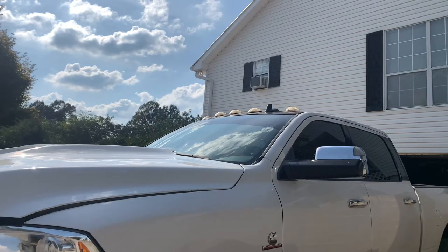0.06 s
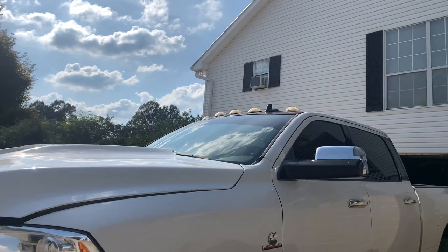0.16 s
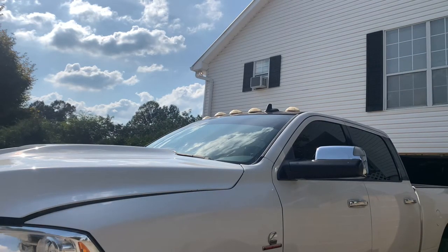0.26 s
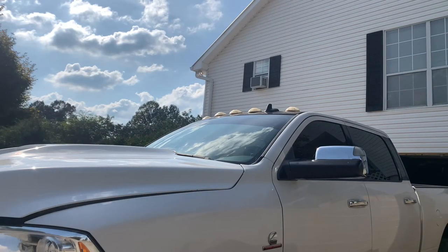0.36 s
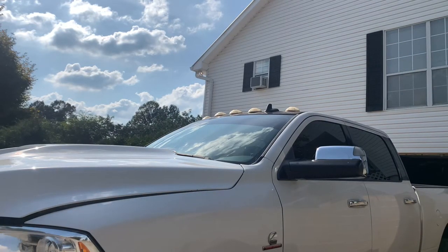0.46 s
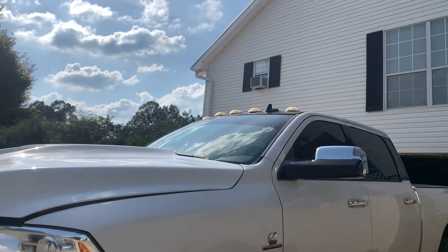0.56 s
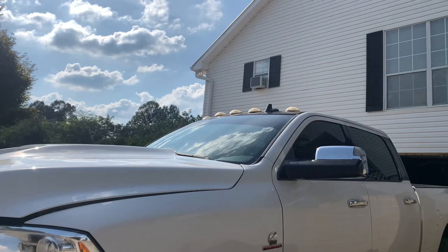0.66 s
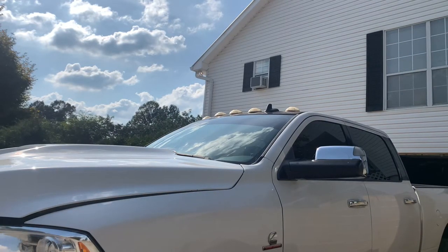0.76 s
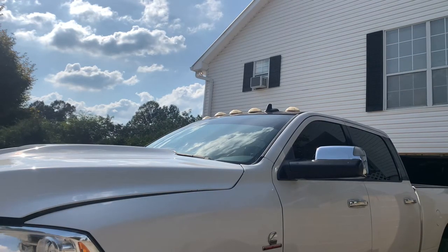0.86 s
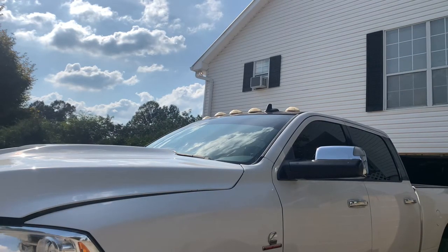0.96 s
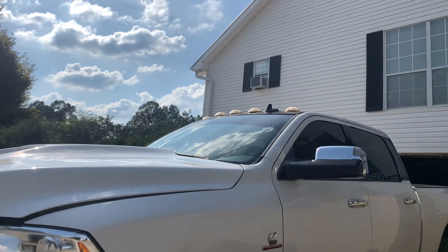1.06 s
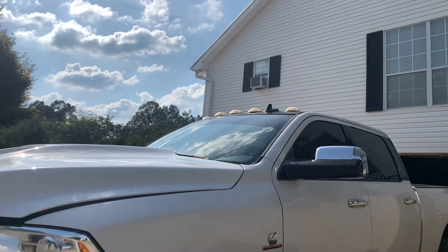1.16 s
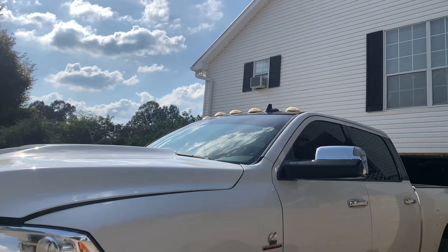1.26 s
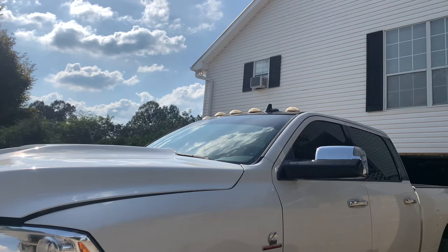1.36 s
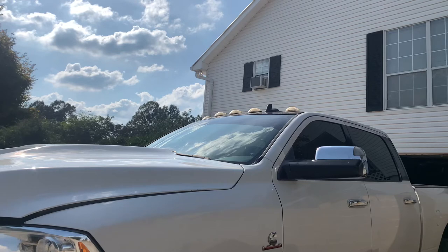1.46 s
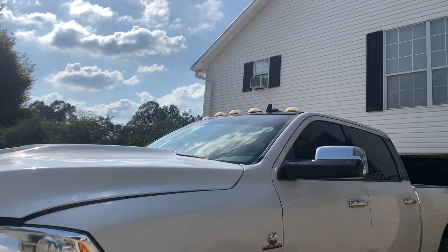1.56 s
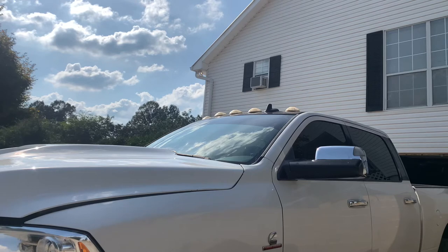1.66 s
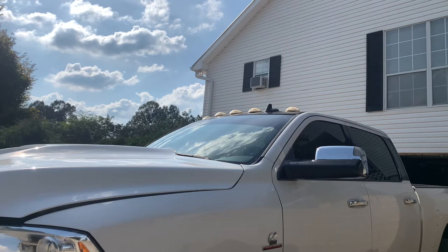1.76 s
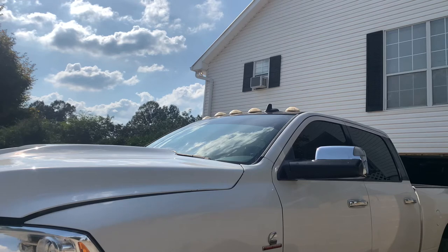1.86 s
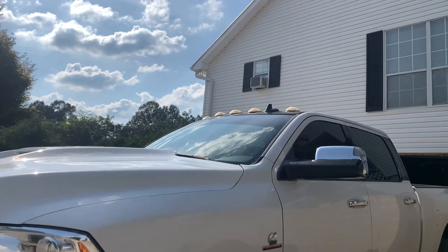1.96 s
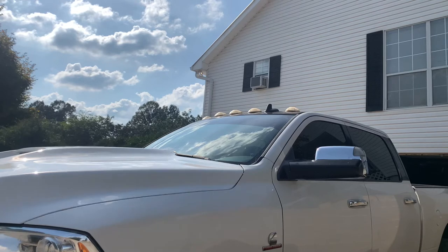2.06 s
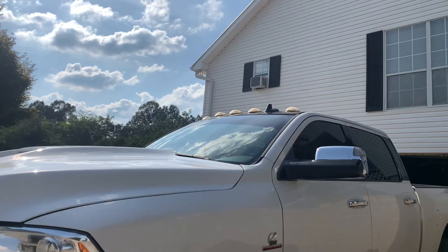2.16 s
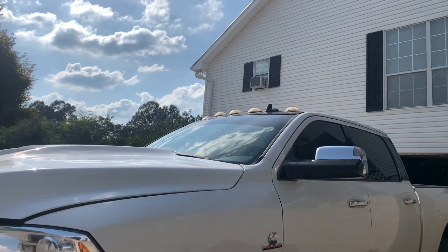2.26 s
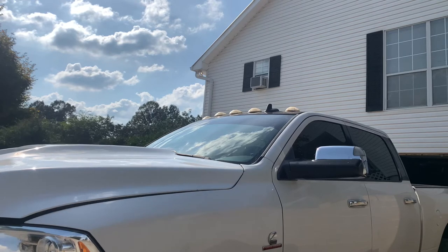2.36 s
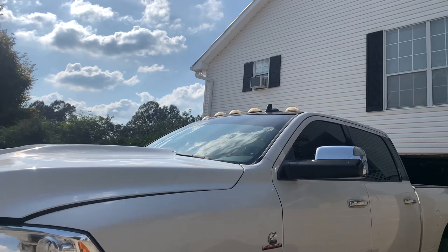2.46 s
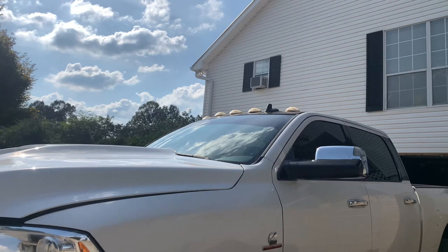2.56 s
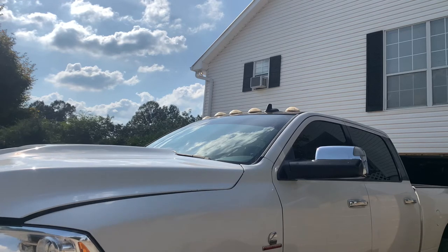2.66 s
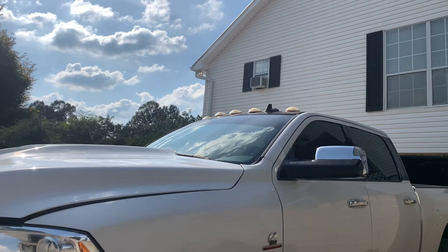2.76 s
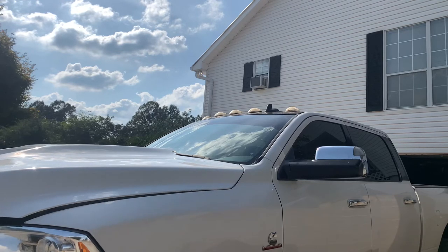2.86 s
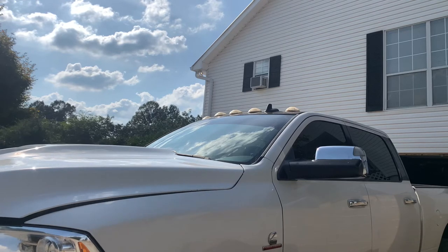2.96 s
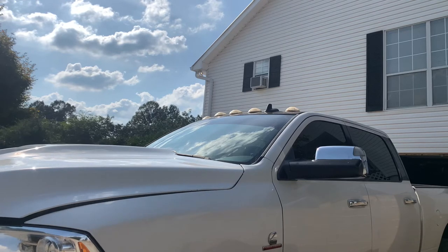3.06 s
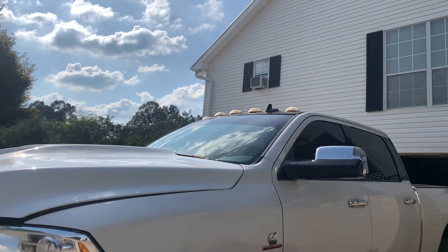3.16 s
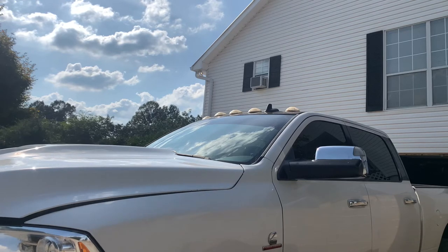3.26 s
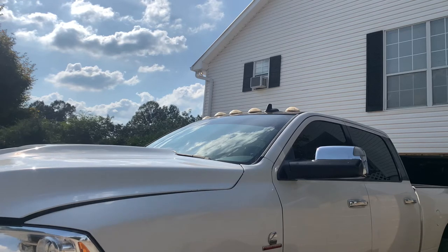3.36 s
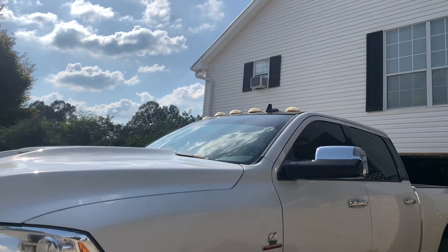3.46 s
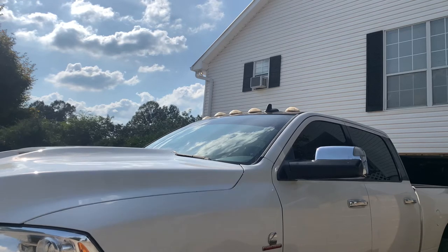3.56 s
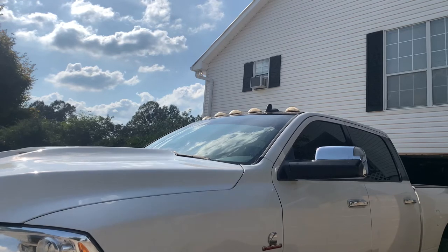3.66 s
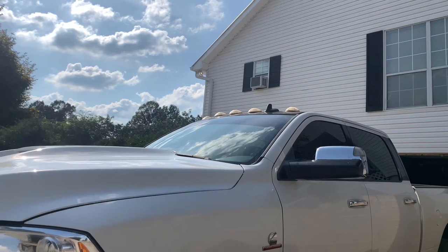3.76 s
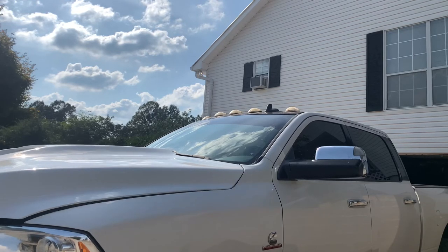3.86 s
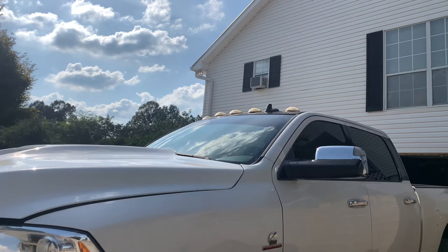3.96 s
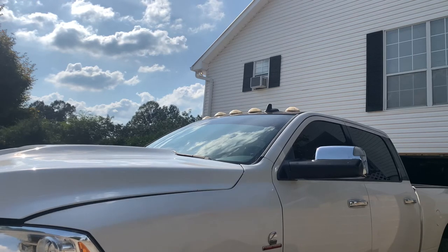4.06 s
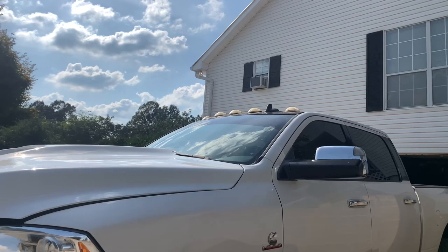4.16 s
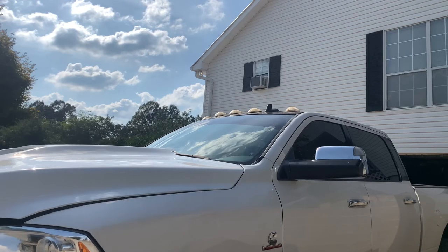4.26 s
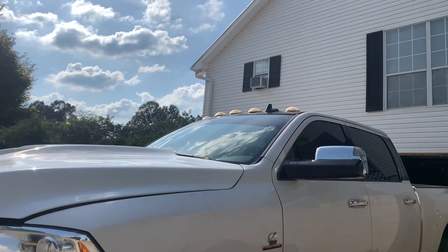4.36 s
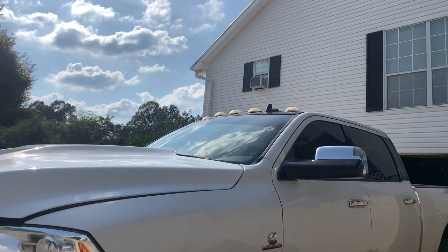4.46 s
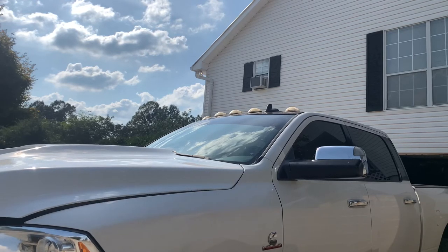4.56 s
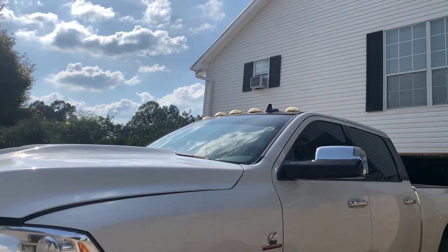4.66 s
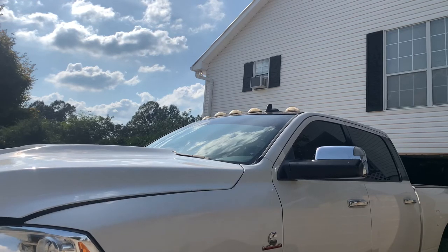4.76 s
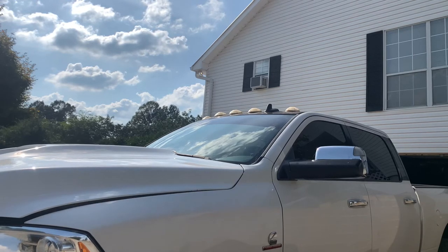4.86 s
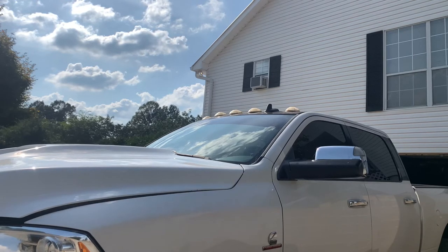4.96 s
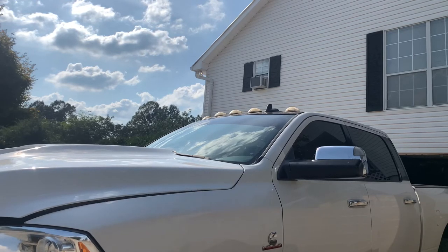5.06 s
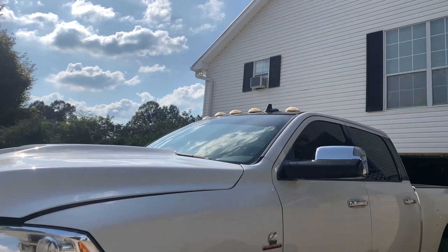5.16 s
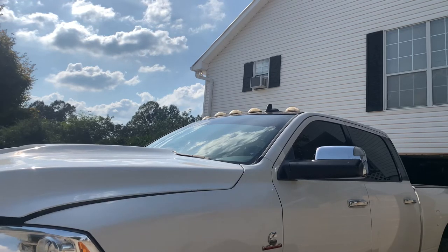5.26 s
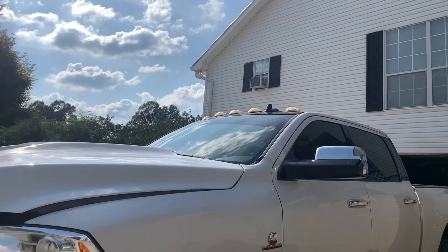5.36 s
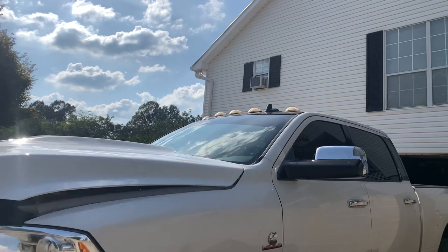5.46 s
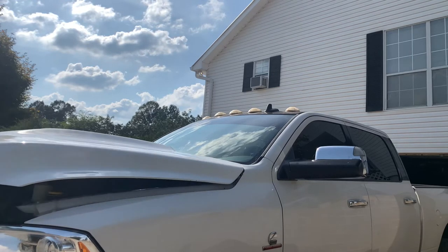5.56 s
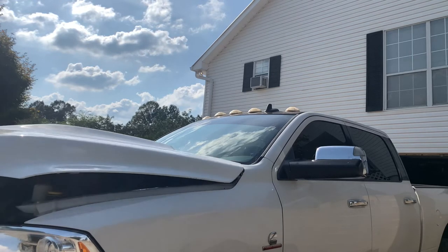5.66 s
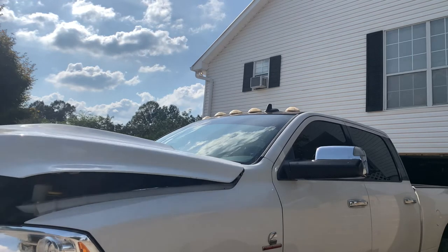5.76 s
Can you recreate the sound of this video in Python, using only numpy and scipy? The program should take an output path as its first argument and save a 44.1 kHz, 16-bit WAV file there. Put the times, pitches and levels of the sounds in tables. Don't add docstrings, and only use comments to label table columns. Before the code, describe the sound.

Close stereo pickup in a yard: steady low hum, soft fan rush and thin insect hiss. After quiet hand brushes come two loud fiberglass hood slams about a second and a half apart, with steel rattle, deep thuds and short bounces. Then skin rubs and squeaks on the latch, the lever knocks softly, and a spring throws the hood up with a sharp clack. The house wall returns a short echo.

```python
import sys
import numpy as np
from scipy import signal
from scipy.fft import rfft, irfft, next_fast_len
from scipy.io import wavfile
from scipy.ndimage import uniform_filter1d, map_coordinates

SR = 44100
rng = np.random.default_rng(int(sys.argv[2]) if len(sys.argv) > 2 else 0)


def invert_db(level):
    return 10 ** (np.asarray(level, dtype=float) / 20)


def wav_record(signal):
    frames = np.transpose(np.atleast_2d(signal))
    bounded = np.clip(frames, -1, 1)
    quanta = np.round(bounded * 32767).astype(np.int16)
    wavfile.write(sys.argv[1], SR, quanta)


N = 256662

# pitch_hz, level_db
HUM_COLOUR = [(15, -46.5), (25, -14.5), (34, -30), (43, 2), (65, 1.5), (86, -7), (101, -13), (118, 0.5),
              (152, -12), (199, -15), (231, -12.5), (257, -19.5), (281, -22), (316, -53), (330, -33.5),
              (430, -55), (730, -120)]
FAN_COLOUR = [(160, -34.5), (280, -3.5), (318, -7.5), (403, -6), (534, -6), (578, -6.5), (1200, -14.5),
              (1560, -32.5), (2640, -120)]
TRAFFIC_COLOUR = [(590, -41), (1000, -7), (1580, -2.5), (1930, -6.5), (2600, -13.5), (4450, -25),
                  (5480, -30), (6800, -30.5), (8840, -63), (15000, -120)]
INSECT_COLOUR = [(4500, -19), (5600, -26.5), (6600, -10), (7300, -8.5), (7800, -2), (8300, -6.5),
                 (8900, -20), (10000, -20), (11200, -12), (11700, -27.5), (13800, -40), (15000, -26),
                 (16000, -32), (16600, -47.5)]
# pitch_hz, likeness (1 same, -1 opposite)
AIR_LIKENESS = [(60, 1), (150, 0.93), (380, 0.87), (950, 0.53), (2380, -0.18), (5980, -0.66),
                (15000, -0.61)]
# pitch_hz, left_over_right_db
AIR_TILT = [(60, 1.5), (150, 1.5), (380, 3), (950, 1), (2380, 1.5), (5980, -2), (15000, 2)]
HOOD_TILT = [(60, 3), (300, 5.5), (900, 7.5), (1800, 2), (3000, 1.5), (4300, -2.5), (5400, -5), (7000, 2)]

# pitch_hz, fade_s
NEAR_FADE = [(100, 0.61), (500, 0.31), (2000, 0.17), (10000, 0.18)]
FAR_FADE = [(200, 0.67), (2000, 1), (10000, 0.57)]
RATTLE_FADE = [(2000, 0.089), (4000, 0.098), (12000, 0.078)]
SKIN_FADE = [(250, 0.48), (700, 0.2), (1800, 0.1)]

# pitch_hz, level_db, fade_s
WHOLE_HOOD = [(54.34, -9, 0.9), (69.6, 8.5, 0.27), (90.5, -13, 0.35), (114.4, 7.5, 0.29),
              (162.1, 4.5, 0.22), (188.4, 4.5, 0.13), (217.5, 4.5, 0.14), (262.4, -7.5, 0.25)]
LATCHED_SKIN = [(293.5, 12, 0.051), (376.3, 8.5, 0.079), (445, 2.5, 0.11), (557.4, -6, 0.26),
                (657, 3.5, 0.073), (792.3, 1.5, 0.14), (988, 3, 0.052), (1174, -3, 0.075),
                (1653, -3, 0.015)]
CATCH_SKIN = [(329, -3, 0.097), (383, 1, 0.43), (466, 4.5, 0.25), (521, -6.5, 0.2), (690, -2, 0.26),
              (835, 0.5, 0.13), (1240, -23, 0.14)]
FREE_SKIN = [(295, -3, .2), (371, -2, .14), (465, -7, .16), (680, -7, .13), (813, -2, .16), (904, 0, .11),
             (955, 0, .13), (1010, -1, .1), (1240, -5, .11), (1448, -6, .12), (1674, -7, .12)]
STRIKER_LOOP = [(4300, -1.5, 0.016), (3760, -12.5, 0.025), (6610, -15, .03), (10500, -10.5, 0.015),
                (11280, -11.5, 0.017)]
CATCH_LEVER = [(2750, -17, 0.036), (4340, -11, 0.052), (6400, 3.5, 0.051), (7900, -20.5, 0.02),
               (10000, -0.5, 0.026)]
HARD_STOP = [(1560, 0, .03), (1760, 0, .022), (1250, -8, .015)]

# pitch_hz, level_db
FRAME_COLOUR = [(1500, 12), (2000, -4), (2600, -12.5), (3300, -8), (4200, -17.5), (5000, -20),
                (6000, -16.5), (7000, -17), (8000, -25.5), (9000, -19), (10500, -21), (12000, -24),
                (13500, -24.5), (15500, -31.5)]
CATCH_COLOUR = [(1500, 12.5), (2300, 15), (3300, -2.5), (4500, -8), (6000, -5), (8300, -12), (10000, -6.5),
                (11500, -35), (15000, -41)]
SPRING_COLOUR = [(1500, 8), (2000, 0.5), (2600, -8), (3300, -14), (4200, -15), (5000, -11.5), (6000, -20),
                 (7000, -14.5), (8000, -16), (9000, -17), (10500, -18), (12000, -17), (13500, -19),
                 (15500, -39)]

# start_s, peak_db, pitch_hz, edge_db (near 9 kHz)
FINGER_CLICKS = [(0.2227, -35, 2950, -31), (3.428, -37, 4200, 10), (4.291, -43, 3270, -17),
                 (4.345, -51, 3340, 6), (4.7335, -43.5, 3230, -1), (4.761, -35.5, 3330, -13.5),
                 (4.778, -27.5, 3150, -3), (4.81, -43, 4300, -20), (4.8134, -47.5, 3820, -23),
                 (4.8834, -46, 3800, -15), (4.889, -30.5, 3200, -20), (4.912, -39.5, 3280, -17.5),
                 (4.9394, -52, 2260, -22)]
# start_s, peak_db, treble_db
CLOTH_PUFFS = [
    (0.102, -43.5, -10),
    (0.315, -48, -11),
    (0.556, -39.5, -12),
    (1.717, -51.5, -9),
    (2.1934, -44.5, 3),
    (2.4277, -52, -17),
    (3.777, -46.5, -2.5),
    (4.0384, -40.5, -38),
    (4.249, -41, -8),
    (4.6138, -47.5, -22),
]
# start_s, length_s, level_db, squeak_hz, grip_db
HAND_STROKES = [
    (3.995, 0.1, -69.5, 3460, 5),
    (4.087, 0.18, -77, 4170, 5),
    (4.345, 0.31, -68.5, 3245, 8.5),
    (4.723, 0.33, -59, 3500, -7.5),
]

# start_s, rattle_db, boom_tilt_db (per octave; a harder push sounds deeper)
STRIKES = [
    (1.934, -16.5, 3.5),
    (3.4561, -13, 0.5),
]
# knock_db, boom_db, ping_db
STRIKE_MIX = (-8, -14, 2)
REBOUND_MIX = (6.9, 1.5, -15)
# start_s, knock_db, boom_db
BUMPER_THUDS = [
    (1.9446, -16, -16.5),
    (1.9616, -15, -9.5),
    (1.9922, -22, -11),
    (3.413, -43, -34),
    (3.433, -32.5, -27.5),
    (3.466, -14.5, -20),
    (3.4758, -9, -15.5),
    (3.4877, -20, -11),
    (3.5501, -29, -11),
]
# start_s, peak_db
STOP_CLACKS = [
    (1.9576, -13),
    (2.0065, -26.5),
    (2.0539, -38.5),
    (3.476, -21.5),
    (3.5286, -24),
    (5.36, -17.5),
]
# start_s, rattle_db
REBOUNDS = [
    (2.201, -42.5),
    (3.7768, -47.5),
]
# start_s, rattle_db, then over the rattle knock_db, boom_db, ping_db
CATCH_DROPS = [
    (5.0245, -34.5, 1.5, -8, -10.5),
    (5.0311, -34.5, 4, -7.5, -24),
    (5.0378, -57.5, 5, -17, -18),
]
# start_s, rattle_db
RELEASE_HITS = [
    (5.3584, -4),
    (5.3757, -19.5),
    (5.387, -19),
    (5.4082, -56),
    (5.4537, -87),
]


def unit(x):
    return x / np.sqrt(np.mean(x ** 2) + 1e-20)


def along(points, hz):
    f, v = np.transpose(points)
    return np.interp(np.log(hz + 1), np.log(f + 1), v)


def wobble(rate):
    knots = rng.standard_normal(int(N * rate / SR) + 4)
    return map_coordinates(knots, [np.arange(N) * rate / SR])


def filtered(x, response):
    m = next_fast_len(x.shape[-1] + 8192)
    return irfft(rfft(x, m) * response(np.fft.rfftfreq(m, 1 / SR)), m)[..., :x.shape[-1]]


def band(x, lo_hz, hi_hz):
    return signal.sosfilt(signal.butter(3, [lo_hz, hi_hz], "bandpass", fs=SR, output="sos"), x)


def dying(fade, channels):
    hz, t, z = signal.stft(rng.standard_normal((channels, SR // 2)), SR, nperseg=128)
    fall_db = -60 * t / along(fade, hz)[:, None]
    return signal.istft(z * invert_db(fall_db), SR, nperseg=128)[1][:, :SR // 2]


def ring(modes, attack_s, spread=1.0, rough=0):
    hz, db, t60 = np.transpose(modes)[:, :, None]
    t = np.arange(min(SR // 2, 64 * int(t60.max() * SR / 64 + 2))) / SR
    luck = spread * rng.standard_normal((3, len(modes), 1))
    beats = signal.resample(rng.standard_normal((len(modes), 40)), len(t), axis=1)
    sines = np.sin(2 * np.pi * hz * (1 + 0.023 * luck[1]) * t + luck[2]) * (1 + rough * beats)
    fading = invert_db(db + 2 * luck[0] - 60 * t / t60)
    out = (fading * sines).sum(0) * (1 - np.exp(-t / attack_s))
    return np.pad(out, (0, SR // 2 - len(t)))


def ports(x, tilt, lead_s):
    half = np.array([[.5], [-.5]])
    return filtered(x, lambda hz: invert_db(half * along(tilt, hz)) * np.exp(2j * np.pi * hz * half * lead_s))


def rush(colour, patchy_db):
    z = signal.stft(rng.standard_normal((2, N)), nperseg=512)[2]
    field = uniform_filter1d(rng.standard_normal(z.shape[1:]), size=6, axis=0)
    field = uniform_filter1d(field, size=14, axis=1)
    pair = signal.istft(z * invert_db(patchy_db * unit(field)), nperseg=512)[1][:, :N]

    def middle_and_side(hz):
        turn = np.arccos(np.clip(along(AIR_LIKENESS, hz), -1, 1)) / 2
        return invert_db(along(colour, hz)) * [np.cos(turn), np.sin(turn)]

    mid, side = filtered(pair, middle_and_side)
    return np.array([mid + side, mid - side]) / np.std(mid)


def air():
    passing_db = 9 * np.exp(-np.arange(N) / SR / 1.7)
    hum = invert_db(-42.5 + .7 * wobble(5)) * rush(HUM_COLOUR, patchy_db=.7)
    fan = invert_db(-58.5 + .6 * wobble(3)) * rush(FAN_COLOUR, patchy_db=.9)
    traffic = invert_db(-69 + passing_db + .4 * wobble(6)) * rush(TRAFFIC_COLOUR, patchy_db=.6)
    insects = invert_db(-76) * rush(INSECT_COLOUR, patchy_db=1.5)
    return hum + fan + traffic + insects


def yard(x):
    near, far = dying(NEAR_FADE, channels=2), dying(FAR_FADE, channels=2)
    tail = near / np.linalg.norm(near[0]) + invert_db(-15.0) * far / np.linalg.norm(far[0])
    thin = filtered(x, lambda hz: 1j * hz / (250 + 1j * hz))
    late = np.pad(thin, (500, 0))
    return signal.fftconvolve(late[None], tail, axes=1)[:, :N]


def placed(x, lead_s):
    return ports(x, HOOD_TILT, lead_s) + invert_db(-12) * yard(x)


def fingers():
    out, t = np.zeros(N + SR), np.arange(SR // 5) / SR
    for s, db, hz, edge_db in FINGER_CLICKS:
        nail = [(hz, 0, .009), (.6 * hz, -3, .007), (.74 * hz, -1, .008), (.87 * hz, 0, .009),
                (1.15 * hz, -4, .006), (1.5 * hz, -12, .004), (2 * hz, -11, .004)]
        edge = [(8300, edge_db, 0.0054), (9660, edge_db, 0.007), (11600, edge_db - 9, .004)]
        click = ring(nail + edge, attack_s=.0001, spread=0.28)[:len(t)]
        out[round(s * SR):][:len(t)] += invert_db(db - 6.5) * click
    puff_rise_s, puff_fade_s = .008, .085
    for s, db, treble_db in CLOTH_PUFFS:
        noise = rng.standard_normal((2, len(t)))
        brush = unit(band(noise[0], 1200, 7100)) + invert_db(treble_db) * unit(band(noise[1], 7500, 13500))
        swell = invert_db(db - 4 - 60 * t / puff_fade_s) * (1 - np.exp(-t / puff_rise_s))
        out[round(s * SR):][:len(t)] += swell * brush
    return out[:N]


def hand():
    out, now = np.zeros(N), np.arange(N) / SR
    grit = invert_db(3 * wobble(400)) * rng.standard_normal((2, N))
    scrape, hiss = unit(band(grit[0], 730, 7600)), unit(band(grit[1], 7000, 12200))
    waver, flutter, octave = 1 + 0.012 * wobble(25), wobble(800), .8 * wobble(550)
    rise, fall = 0.18, 0.78
    for s, length_s, db, hz, grip_db in HAND_STROKES:
        along_stroke = (now - s) / length_s
        on = np.clip(np.minimum(along_stroke / rise, (1 - along_stroke) / fall), 0, 1)
        turn = 2 * np.pi * np.cumsum(hz * waver) / SR
        squeak = unit(flutter * np.sin(turn) + octave * np.sin(2 * turn))
        hiss_db = -25.5 - 2.65 * grip_db
        out += on * invert_db(db) * (invert_db(grip_db) * squeak + 2.0 * scrape + invert_db(hiss_db) * hiss)
    return out


def spring_slip():
    s, db = RELEASE_HITS[0]
    before = s - np.arange(N) / SR
    on = (before > 0) * (before < 0.016)
    scrape = unit(band(rng.standard_normal(N), 900, 12000))
    return on * invert_db(db - 22 - 1300.5 * np.abs(before)) * scrape


def stops():
    out = np.zeros(N + SR)
    for s, db in STOP_CLACKS:
        out[round(s * SR):][:SR // 2] += invert_db(db - 1) * ring(HARD_STOP, attack_s=.0005, spread=.3)
    return out[:N]


def slam_contacts():
    rows = [(s, db, *STRIKE_MIX) for s, db, _ in STRIKES]
    rows += [(s, db, *REBOUND_MIX) for s, db in REBOUNDS]
    for s, db in STOP_CLACKS[:-1]:
        rattle_db = db - 6
        rows.append((s, rattle_db, 4, -17.5 - rattle_db, -22))
    thud_rattle_db = -12.5
    for s, knock_db, boom_db in BUMPER_THUDS:
        rattle_db = knock_db + thud_rattle_db
        rows.append((s, rattle_db, -thud_rattle_db, boom_db - rattle_db, -28.5))
    return [(*row, min(STRIKES, key=lambda hit: abs(hit[0] - row[0]))[2]) for row in rows]


def release_contacts(tilt_db):
    return [(s, db, -3.5 + (0.62 - 1) * db, -22 - db, -11.5, tilt_db) for s, db in RELEASE_HITS]


def tilted(modes, db_per_octave, pivot_hz):
    return [(hz, db + db_per_octave * np.log2(hz / pivot_hz), t60) for hz, db, t60 in modes]


def frame_rattle(t):
    return dying(RATTLE_FADE, channels=1)[0] * (1 - np.exp(-t / 0.00084)) * (1 + invert_db(5 - 60 * t / 0.01))


def skin_buzz(t):
    return band(dying(SKIN_FADE, channels=1)[0], 170, 1720) * (1 - np.exp(-t / 0.00094))


def hood(contacts, skin, metal, colour, ping_db, buzz_db, skin_lead_s, skin_tilts=0):
    rattle, ping, body = np.zeros((3, N + SR))
    t = np.arange(SR // 2) / SR
    for s, db, knock_db, boom_db, steel_db, tilt_db in contacts:
        at = slice(round(s * SR), round(s * SR) + len(t))
        rattle[at] += invert_db(db - 10.0) * frame_rattle(t)
        ping[at] += invert_db(db + steel_db + ping_db) * ring(metal, attack_s=0.00073, spread=.3)
        buzz = invert_db(buzz_db) * skin_buzz(t)
        knock = ring(tilted(skin, skin_tilts * tilt_db, 750), attack_s=.0015, rough=.6)
        body[at] += invert_db(db + knock_db - 12) * (knock + buzz)
        boom = ring(tilted(WHOLE_HOOD, tilt_db, 135), attack_s=0.002, spread=0.53, rough=0.56)
        body[at] += invert_db(db + boom_db - 11.0) * boom

    def gain(hz):
        steep = (hz / 2200) ** 4
        return invert_db(along(colour, hz)) * steep / (1 + steep)

    usual_gain = np.sqrt(np.mean(gain(np.linspace(2500, 15000, 999)) ** 2))
    latch = ping[:N] + filtered(rattle[:N], gain) / usual_gain
    return placed(latch, 2.56e-4) + placed(body[:N], skin_lead_s)


def scene():
    loose_tilt_db = 3
    pushes = hood(slam_contacts(), LATCHED_SKIN, STRIKER_LOOP, FRAME_COLOUR,
                  ping_db=-3.5, buzz_db=10, skin_lead_s=8e-5, skin_tilts=1)
    pushes = pushes + placed(stops(), 7e-5)
    catch = hood([(*row, loose_tilt_db) for row in CATCH_DROPS], CATCH_SKIN, CATCH_LEVER, CATCH_COLOUR,
                 ping_db=-2, buzz_db=10.5, skin_lead_s=0.000097)
    release = hood(release_contacts(loose_tilt_db), FREE_SKIN, CATCH_LEVER, SPRING_COLOUR,
                   ping_db=-2.5, buzz_db=8.0, skin_lead_s=0.00021)
    touch = placed(fingers() + hand() + spring_slip(), 0.00028)
    return pushes + catch + release + touch + ports(air(), AIR_TILT, lead_s=7e-5)


def band_limit(x):
    return signal.sosfilt(signal.butter(12, 16960, fs=SR, output="sos"), x)


def record(dry):
    share = lambda hz: 1 / (1 + (6580 / (hz + 1)) ** 14)
    twist = lambda hz: np.exp(1j * np.pi * np.array([[-1], [1]]) * (hz - 11006) / 4610)
    one_port = dry[0] + .13 * np.array([[1], [-1]]) * dry[1]
    treble = filtered(one_port, lambda hz: share(hz) * twist(hz))
    wide = filtered(dry, lambda hz: 1 - share(hz)) + treble
    wide = filtered(wide, lambda hz: (1j * hz / (30 + 1j * hz)) ** 4 * (hz < 16200))
    wide = wide / (1 + np.abs(wide / .92) ** 6) ** (1 / 6)
    return band_limit(wide)


dry = scene()
out = record(dry)
wav_record(out)
```